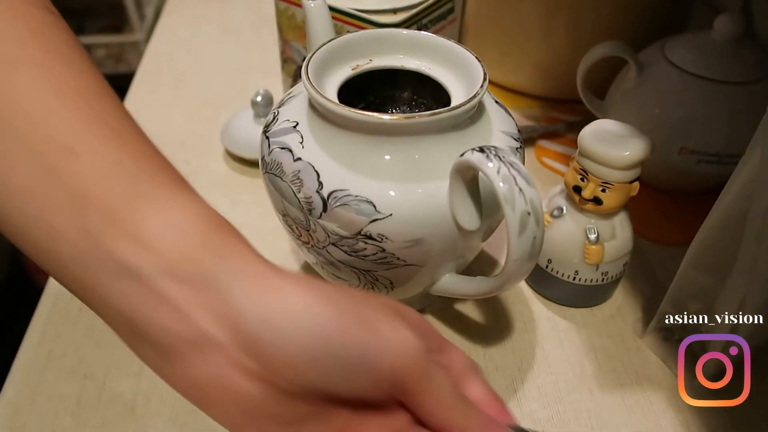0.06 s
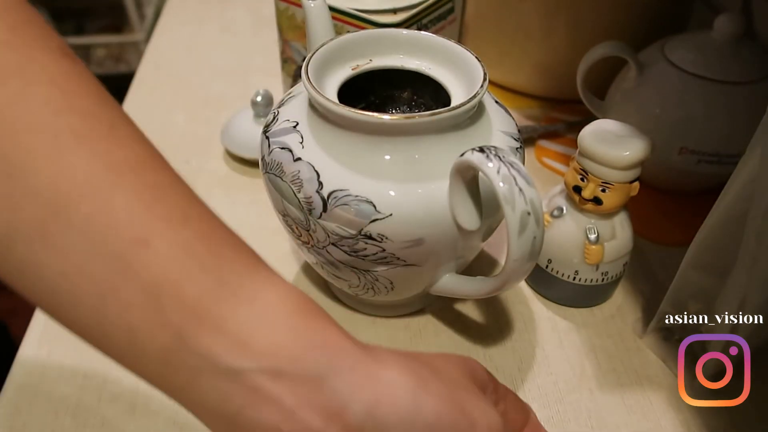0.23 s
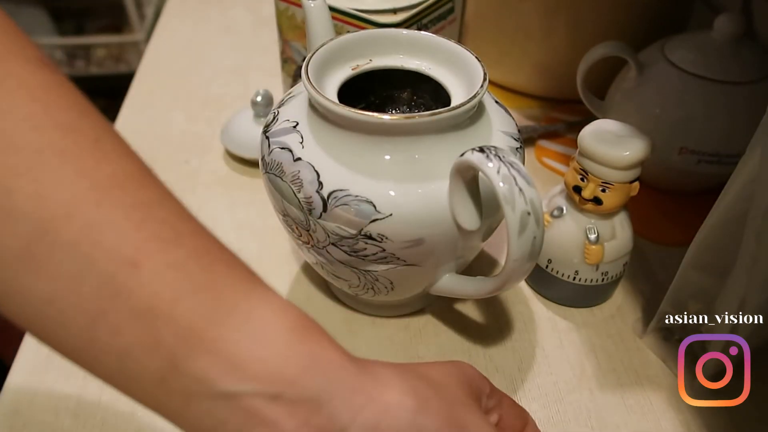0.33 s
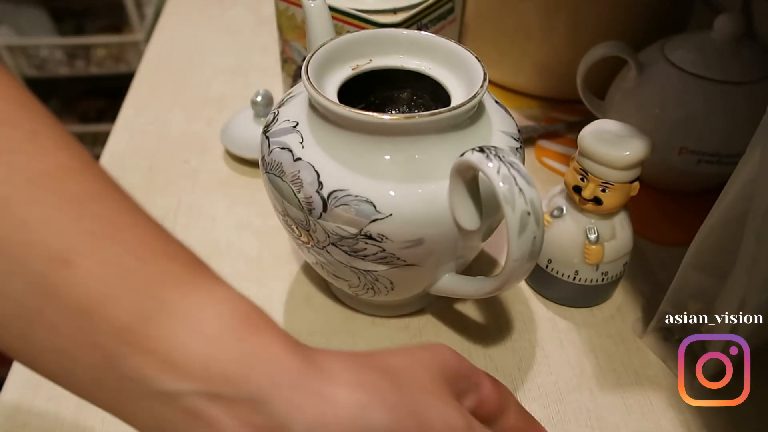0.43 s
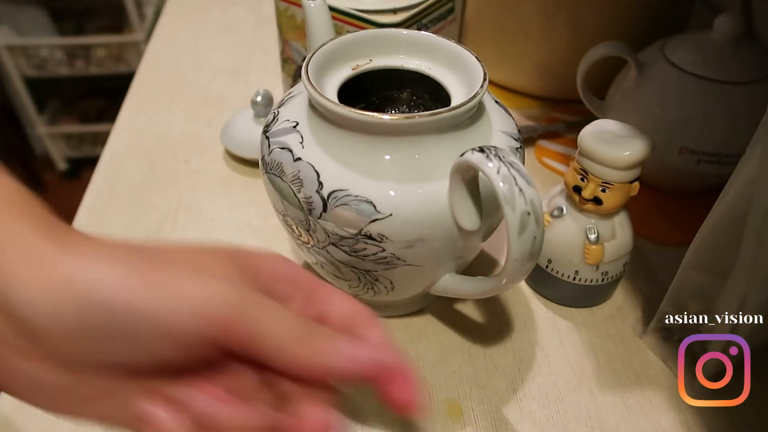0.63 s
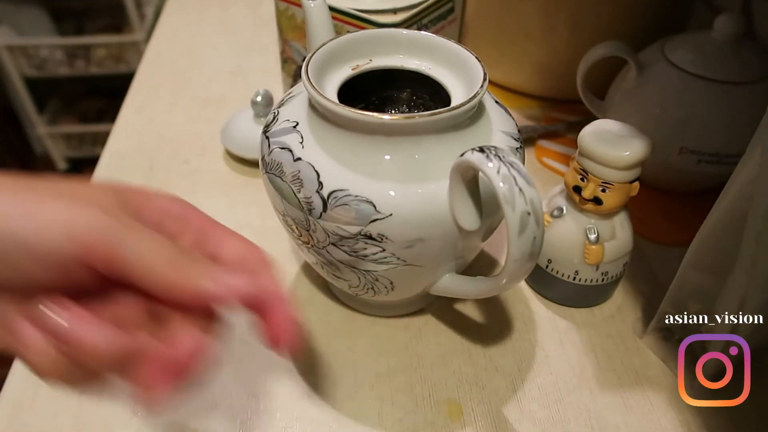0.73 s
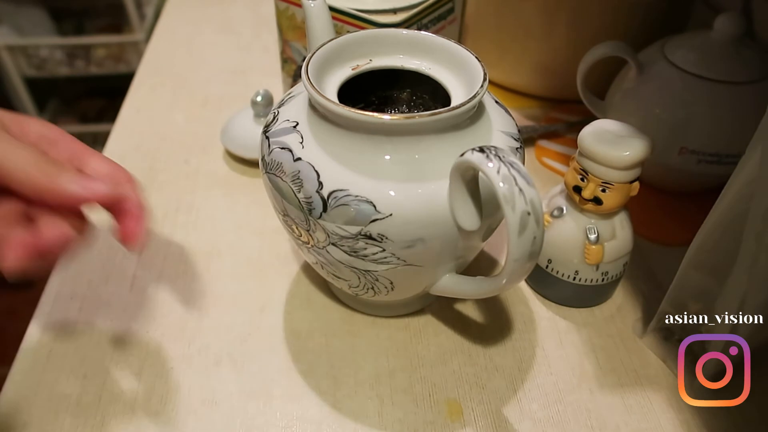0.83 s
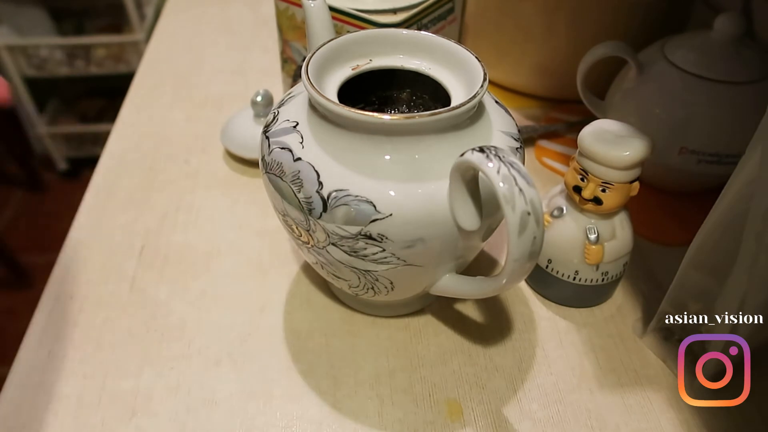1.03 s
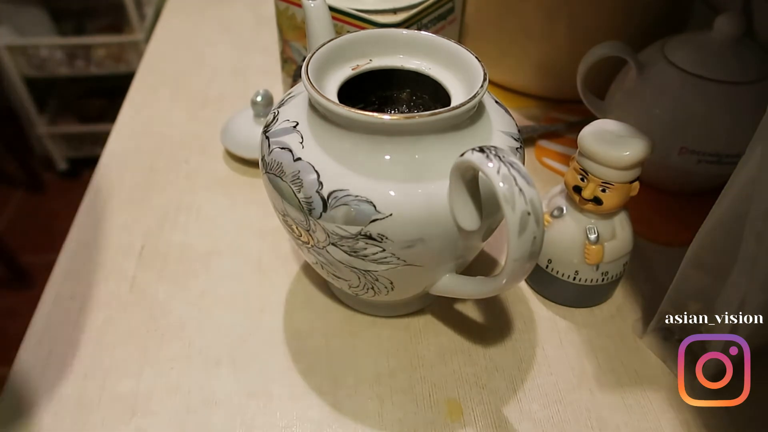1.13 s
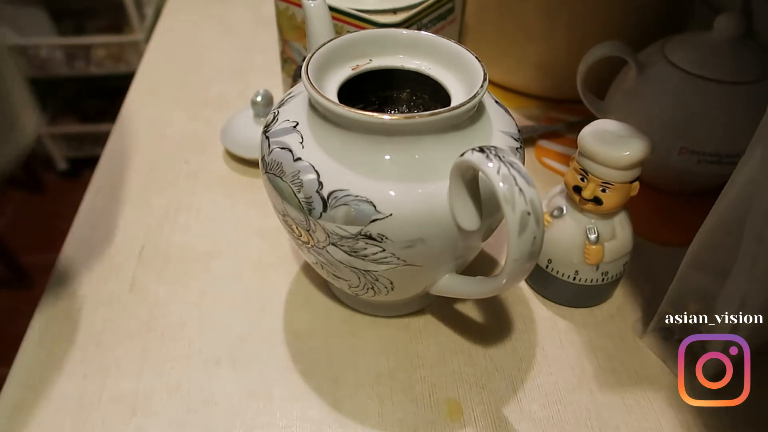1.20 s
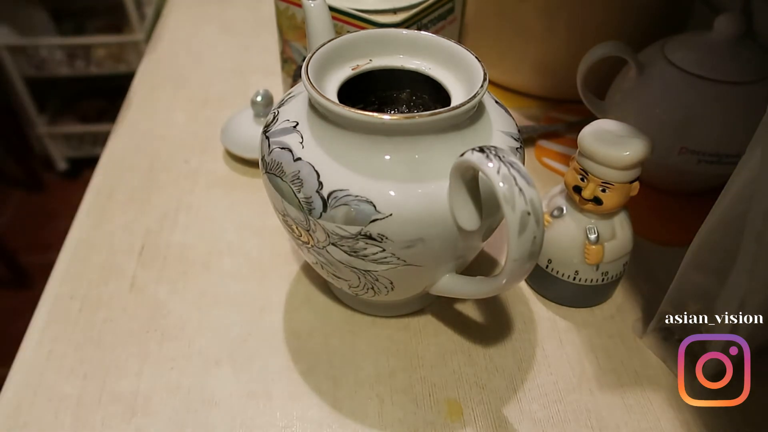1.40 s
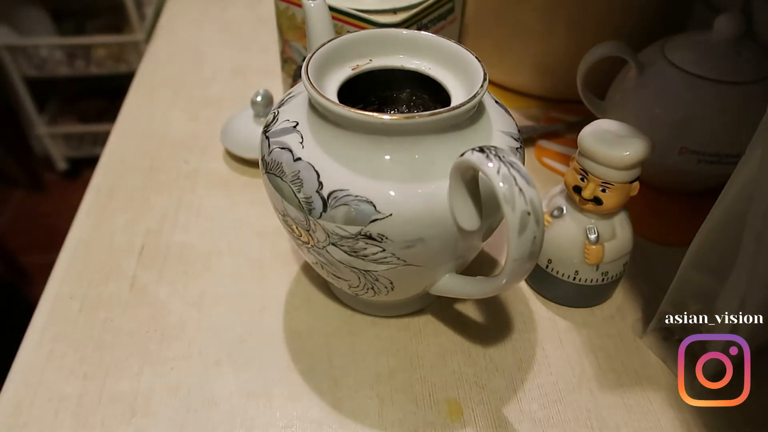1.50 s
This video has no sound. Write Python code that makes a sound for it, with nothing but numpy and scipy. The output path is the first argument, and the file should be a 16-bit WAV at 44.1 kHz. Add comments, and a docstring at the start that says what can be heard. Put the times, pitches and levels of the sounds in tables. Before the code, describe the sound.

Steel cutlery is laid on a table in a quiet kitchen, close to the microphone and slightly right. The handle knocks dully and bounces, then the rest drops, clatters and rings briefly. A hand rustles faintly away.

```python
"""Steel cutlery laid on a kitchen table, close to a stereo microphone and a little to its right.
A handle knocks dully and bounces; then the rest drops, ticks, rings in its bending and high steel modes
and chatters on the top until it lies still. A hand rustles faintly, once before and then as it withdraws.
The small room answers briefly, over soft air and a low hum."""
import sys
import numpy as np
from scipy import signal
from scipy.fft import rfft, irfft, next_fast_len
from scipy.io import wavfile
from scipy.ndimage import map_coordinates

SR = 44100
rng = np.random.default_rng(int(sys.argv[2]) if len(sys.argv) > 2 else 0)


def to_wav(sig):
    """Store sig (one row per channel, or 1-D mono) as 16-bit WAV at the path in sys.argv[1].

    Samples outside -1..1 are clipped; the rate is SR.
    """
    pcm = np.clip(np.atleast_2d(sig), -1, 1) * 32767
    pcm = np.round(pcm).astype(np.int16)
    wavfile.write(sys.argv[1], SR, pcm.T)  # frames by channels


N = 68355

# Room tone of the kitchen. Each row: frequency in Hz, relative level in dB.
AIR_SPECTRUM = [(20, -16), (30, -28), (48, -22), (65, -8.5), (105, -6), (200, -10.5), (271, -14.5),
                (327, -6.5), (393, -14.5), (570, -14.5), (1050, -21), (2320, -24.5), (4880, -32.5),
                (8500, -37.5), (14100, -46.5)]
# Hand movements. Each row: centre in seconds, width in seconds, level in dB, resonance in Hz.
HAND_RUSTLES = [(0.046, 0.0095, -46.5, 765), (0.791, .02, -57, 1340), (0.977, 0.0057, -51.5, 3220),
                (1.193, 0.016, -52, 2360), (1.255, 0.022, -55, 500), (1.402, 0.015, -50.5, 1900),
                (1.439, 0.015, -46, 627)]
# Colour common to all rustles. Each row: frequency in Hz, relative level in dB.
RUSTLE_SPECTRUM = [(150, -34), (750, 5.5), (1100, -0.5), (2400, -0.5), (5000, -8.5), (12000, -16),
                   (15000, -24)]
# Handle bounces. Each row: start in seconds, then gains in dB for thud, clack, low ring and crack.
HANDLE_KNOCKS = [(.2301, -2, 1.5, -0.5, 1), (.2924, -10, -7, -5, -8.5), (.3215, -15, -12.5, -6.5, -13),
                 (.3424, -24.5, -14.5, -22, -19.5), (0.4275, -31.5, -28, -34, -28)]
# Table thud, handle clack, low table boom. Each row: pitch in Hz, relative level in dB, t60 in seconds.
THUD_MODES = [(655, -9.5, 0.029), (741, -6, 0.023), (1092, -8.5, 0.029)]
CLACK_MODES = [(1387, -5.5, 0.015), (1467, -6.5, 0.014), (1680, -45, 0.0098)]
BOOM_MODES = [(105, -34.5, 0.18), (326.8, -37, 0.42)]
# Noisy edge of a knock. Each row: frequency in Hz, relative level in dB.
CRACK_SPECTRUM = [(300, 3), (1500, 4), (2400, -7.5), (6500, -4), (10000, -8), (14000, -13.5)]
# Course of the chatter. Each row: time in seconds, level in dB.
CHATTER_LEVELS = [(0.466, -32.5), (.5, -34), (.525, -32), (.55, -30), (0.598, -32.5), (.63, -41.5),
                  (.68, -33.5), (0.726, -40.5), (0.748, -42.5), (0.772, -51.5)]
# Falling cutlery. Each row: start in seconds, then gains in dB for bending, ring, tines, tick and table.
DROP_CONTACTS = [(0.4681, 1.5, -16, 2.5, 0, 1.5), (0.4791, -4.5, 2, -26, -0.5, -2.5),
                 (0.5387, -3, -23, -26, -7, -8), (0.5445, -5.5, -30, -10, -31, -7.5),
                 (0.5536, -5, -29, 5, -18, -23), (0.5852, -10, -18, -11, -13, -16.5),
                 (0.5917, -3.5, -21, -14, -12, -13), (0.6134, -6.5, -9, -18, -18, -19),
                 (0.6459, -44, -17.5, -30, -13, -12), (0.6725, -4, -13.5, -16, -25, -20),
                 (0.7146, -13, -17.5, -34, -24, -30)]
# Chatter, steel tick and shaken table top. Each row: frequency in Hz, relative level in dB.
CHATTER_SPECTRUM = [(60, -16), (105, 7.5), (170, -8.5), (260, 1), (600, 1.5), (750, -13), (1000, 3.5),
                    (1400, 5), (1750, -5), (2300, 0), (2850, -10), (3100, -10), (4200, -9), (5800, -34),
                    (7000, -18), (10000, -27), (11500, -42), (14000, -39)]
TICK_SPECTRUM = [(500, -25), (3000, -11), (4300, -2), (5200, -3), (5900, 1), (6500, -7), (7200, -15),
                 (10300, -12), (11300, -24), (14000, -32)]
TABLE_SPECTRUM = [(60, -19), (105, -7), (170, -11), (300, -3.5), (480, -0.5), (720, 0), (860, 9),
                  (1050, -36), (1400, -5.5), (2600, -4.5), (3100, -15.5), (4200, -12), (5600, -11.5),
                  (7000, -13.5), (14000, -21.5)]
# Bending of the steel. Each row: settled pitch in Hz, relative level in dB, free t60 in seconds.
BENDING_MODES = [(266.5, -36, 0.45), (480.6, -36.5, 0.33), (860, -30, 0.17), (910.5, -17.5, 0.21),
                 (1123, -40, 0.47), (1415, -40, 0.13), (2090, -40.5, 0.32), (2380, -41, 0.42)]
# High steel modes. Each entry: pitch in Hz.
RING_HZ = [3337, 4775, 5403, 6281, 7429, 8796, 10273, 12900]
# The same modes in turn. Each row: relative level in dB, free t60 in seconds,
# lead of the right channel in radians, share driven by the tines from 0 to 1.
RING_MODES = [(-32, .33, 0.9, 0.9), (-29, 0.49, 2.5, 0.2), (-33, 0.2, 0, .2), (-24, 0.29, 4, 0),
              (-31, 0.17, 4, 0.16), (-34, 0.37, 4, 0.76), (-34.5, 0.35, 1.55, 1), (-26.5, 0.2, 3.5, 1)]
# Tail of the kitchen. Each row: frequency in Hz, t60 in seconds.
ROOM_DECAY = [(100, 0.18), (500, 0.47), (900, 0.37), (1400, .46), (3000, 0.45), (7000, 0.25),
              (14000, 0.067)]
# Diffuse sound at the microphone. Each row: frequency in Hz, left-right correlation.
DIFFUSE_LIKENESS = [(50, .98), (130, .75), (300, .5), (2500, .5), (6000, .15), (13000, -.4)]
# Direct sound at the microphone. Each row: frequency in Hz, lead of the right channel in radians.
RIGHT_LEAD = [(450, 0), (2800, .25), (4200, .7), (5800, 1.1), (7000, 2.2), (13000, 2.6)]

REST_S = .742  # from here the table damps the steel
SIDES = np.array([[-.5], [.5]])  # splits a difference between left and right


def amp(db):
    return 10 ** (np.asarray(db) / 20)


def unit_rms(x):
    return x / np.sqrt(np.mean(x ** 2) + 1e-20)


def along(points, hz):
    """Read (Hz, value) points on a log frequency axis."""
    frequencies, values = np.transpose(points)
    return np.interp(np.log(hz + 1), np.log(frequencies + 1), values)


def since(start):
    """Seconds since start, zero before."""
    return np.maximum(np.arange(N) / SR - start, 0)


def decay(start, t60):
    """One until start, then down 60 dB every t60 seconds."""
    return np.exp(-np.log(1000) * since(start) / t60)


def fade(start, t60, rise=0.000094):
    """A quick rise and an exponential decay."""
    return (1 - np.exp(-since(start) / rise)) * decay(start, t60)


def wobble(rate):
    """A smooth random curve, rate knots a second."""
    return map_coordinates(rng.standard_normal(4096), [np.arange(N) * rate / SR], mode="wrap")


def filtered(x, response):
    """Pass x through a complex response of frequency."""
    size = next_fast_len(N + SR // 2)
    return irfft(rfft(x, size) * response(np.fft.rfftfreq(size, 1 / SR)), size)[..., :N]


def coloured(x, spectrum):
    return unit_rms(filtered(x, lambda hz: amp(along(spectrum, hz))))


def noise(spectrum):
    return coloured(rng.standard_normal(N), spectrum)


def diffuse(spectrum):
    """Noise from all round the microphone, the channels most alike in the bass."""
    def mid_side(hz):
        angle = np.arccos(np.clip(along(DIFFUSE_LIKENESS, hz), -1, 1)) / 2
        return np.array([np.cos(angle), np.sin(angle)])
    mid, side = filtered(np.array([noise(spectrum), noise(spectrum)]), mid_side)
    return unit_rms(np.array([mid + side, mid - side]))


def struck(modes, start, rise=0.00064):
    """Damped sines, one for each (Hz, dB, t60)."""
    t = since(start)
    return sum(amp(db) * fade(start, t60, rise) * np.sin(2 * np.pi * hz * t) for hz, db, t60 in modes)


def restruck(times, gains, t60, rise, kick):
    """Envelope and phase of a mode: every contact adds energy and jolts the phase."""
    energy, phase = np.full(N, 1e-14), np.full(N, rng.uniform(0, 2 * np.pi))
    for start, gain, jolt in zip(times, gains, rng.standard_normal(len(times))):
        fresh = (gain * fade(start, t60, rise)) ** 2
        energy += fresh
        phase += kick * jolt * np.maximum.accumulate(np.sqrt(fresh / energy))
    return np.sqrt(energy), phase


def room_tone(air_db=-49.5, hum_db=-54, hum_hz=40):
    """Soft air all round the kitchen and a low, slightly wavering hum."""
    hum = amp(0.53 * wobble(7.1)) * np.sin(2 * np.pi * hum_hz * since(0) + 0.41 * wobble(5.7))
    return amp(air_db) * diffuse(AIR_SPECTRUM) + amp(hum_db) * unit_rms(hum)


def hand_rustles(peak_db=6, width_octaves=.15, grain_db=2.5):
    """The hand moves near the microphone: grainy swells of noise, each with its own resonance."""
    out = np.zeros((2, N))
    for centre_s, width_s, db, peak_hz in HAND_RUSTLES:
        def resonance(hz):
            octaves = np.log2((hz + 1) / peak_hz)
            return amp(peak_db * np.exp(-.5 * (octaves / width_octaves) ** 2))
        swell = np.exp(-.5 * ((since(0) - centre_s) / width_s) ** 2)
        level = amp(db + grain_db * wobble(250))
        out += level * swell * unit_rms(filtered(diffuse(RUSTLE_SPECTRUM), resonance))
    return out


def handle_knocks(ring_hz=850.4, ring_delay_s=0.00561):
    """The held handle hits the table: thud, clack, crack and boom, with a short low ring just after."""
    out = np.zeros(N)
    for start, thud_db, clack_db, ring_db, crack_db in HANDLE_KNOCKS:
        out += amp(thud_db) * struck(THUD_MODES, start)
        out += amp(clack_db) * struck(CLACK_MODES, start)
        out += amp(crack_db - 21.5) * fade(start, t60=.032) * noise(CRACK_SPECTRUM)
        out += amp(ring_db / 2) * struck(BOOM_MODES, start, rise=0.0013)
        out += amp(ring_db) * struck([(ring_hz, -7.5, 0.044)], start + ring_delay_s, rise=0.002)
    return signal.lfilter(*signal.butter(1, 150, "high", fs=SR), out)


def chatter(taps_per_s=700):
    """The vibrating steel buzzes on the table in many tiny contacts."""
    times, levels_db = np.transpose(CHATTER_LEVELS)
    envelope = amp(np.interp(since(0), times, levels_db, left=-120, right=-120))
    touches = rng.random(N) < taps_per_s / SR
    taps = touches * rng.choice([-1, 1], N) * amp(rng.standard_normal(N))
    table_response = (fade(0, t60=0.016) * rng.standard_normal(N))[:SR // 10]
    buzz = signal.fftconvolve(taps, table_response)[:N]
    return envelope * coloured(buzz, CHATTER_SPECTRUM)


def contact_ticks(ping_hz=5870):
    """Each contact of the loose cutlery gives a hard, pitched tick and shakes the table top."""
    out = np.zeros(N)
    for start, _, _, _, tick_db, table_db in DROP_CONTACTS:
        tick = amp(-14) * fade(start, t60=.017) * noise(TICK_SPECTRUM)
        ping = struck([(ping_hz, -8.5, 0.011)], start)
        out += amp(tick_db) * (tick + ping)
        out += amp(table_db - 12) * fade(start, t60=0.052, rise=0.0011) * noise(TABLE_SPECTRUM)
    return out


def steel_bending(pitch_sag=.045, settle_s=0.057):
    """The low bending modes rise a little in pitch as the piece settles and die once it lies still."""
    times, bend_db = np.transpose(DROP_CONTACTS)[:2]
    pitch_ratio = 1 - pitch_sag * np.exp(-since(times[0]) / settle_s)
    clock = np.cumsum(pitch_ratio) / SR
    out = np.zeros(N)
    for hz, db, t60 in BENDING_MODES:
        envelope, phase = restruck(times, amp(bend_db), t60, rise=0.0014, kick=0.86)
        level = amp(db + 1.13 * wobble(108.5))
        out += level * envelope * np.sin(2 * np.pi * hz * clock + phase + 0.25 * wobble(120))
    return out * decay(REST_S, t60=.07)


def steel_ring(jitter_rad=.2, flutter_db=1.5):
    """The high modes ring through all contacts, each reaching the two channels with its own phase."""
    times, _, ring_db, tine_db = np.transpose(DROP_CONTACTS)[:4]
    out = np.zeros((2, N))
    for hz, (db, t60, lead, tine_share) in zip(RING_HZ, RING_MODES):
        drive = np.sqrt((1 - tine_share) * amp(ring_db) ** 2 + tine_share * amp(tine_db) ** 2)
        envelope, phase = restruck(times, drive, t60, rise=0.00087, kick=0.63)
        phase = phase + jitter_rad * wobble(128.5) + lead * SIDES
        level = amp(db + flutter_db * wobble(59.8))
        out += level * envelope * np.sin(2 * np.pi * hz * since(0) + phase)
    return out * decay(REST_S, t60=0.3)


def kitchen_reverb(x, early_db=-10, tail_db=-10):
    """Near surfaces answer at once, then the kitchen's short tail."""
    bright, length = [(100, -6), (10000, 5.5)], SR // 2
    hz, t, bands = signal.stft(diffuse(bright)[:, :length], SR, nperseg=256)
    bands *= np.exp(-np.log(1000) * t / along(ROOM_DECAY, hz)[:, None])
    tail = signal.istft(bands, SR, nperseg=256)[1][:, :length]
    early = (diffuse(bright) * fade(0.0018, t60=0.083, rise=0.0025))[:, :length]
    tail *= amp(tail_db) / np.linalg.norm(tail[0])
    early *= amp(early_db) / np.linalg.norm(early[0])
    return signal.fftconvolve(x, early + tail, axes=1)[:, :N]


def scene(right_over_left_db=0.74, ring_send=.35):
    """The cutlery lands close by, a little to the right; its high ring is heard mostly direct."""
    impacts = handle_knocks() + contact_ticks() + steel_bending() + chatter()
    direct = filtered(impacts, lambda hz: np.exp(1j * along(RIGHT_LEAD, hz) * SIDES))
    ring = steel_ring()
    cutlery = direct + ring + kitchen_reverb(direct + ring_send * ring)
    return cutlery * amp(right_over_left_db * SIDES) + room_tone() + hand_rustles()


def record(dry, top_hz=14100):
    """The treble ends steeply at the band limit."""
    return filtered(dry, lambda hz: 1 / (1 + (hz / top_hz) ** 80))


dry = scene()
out = record(dry)
to_wav(out)
```